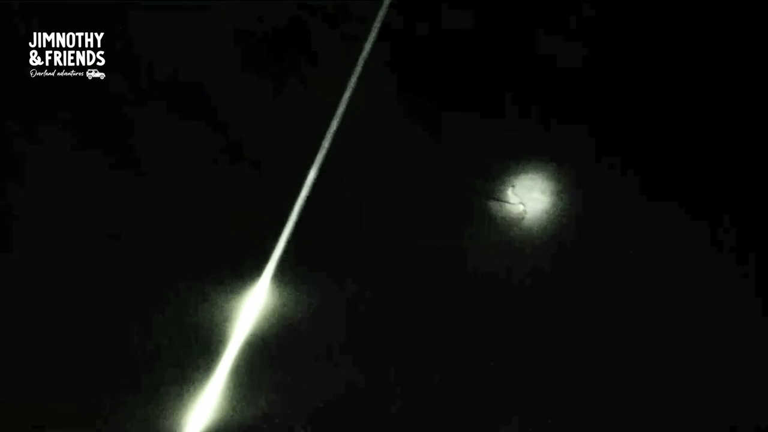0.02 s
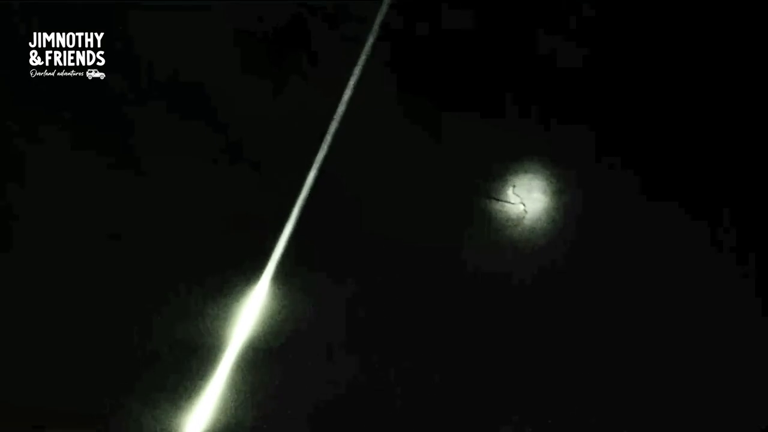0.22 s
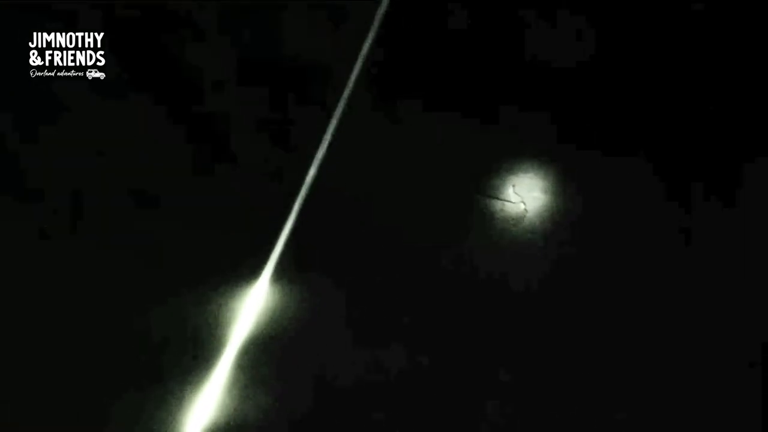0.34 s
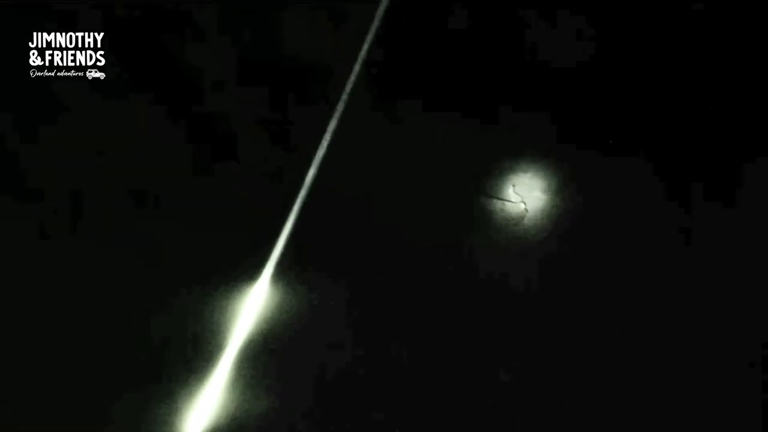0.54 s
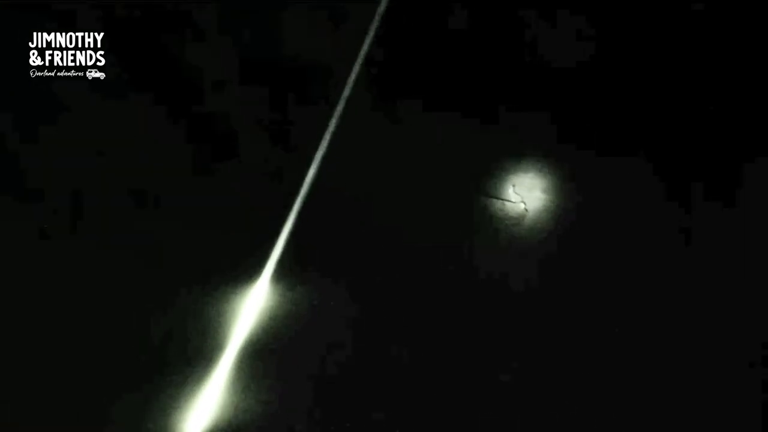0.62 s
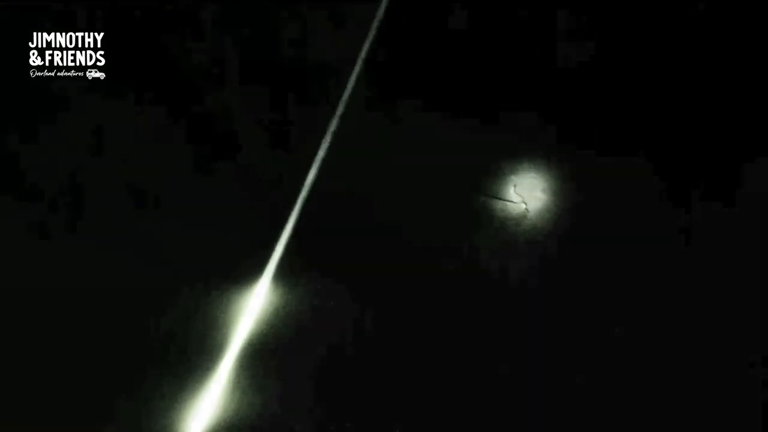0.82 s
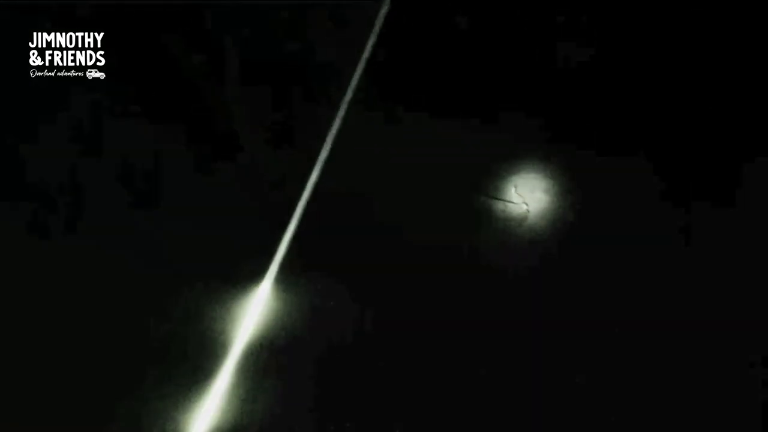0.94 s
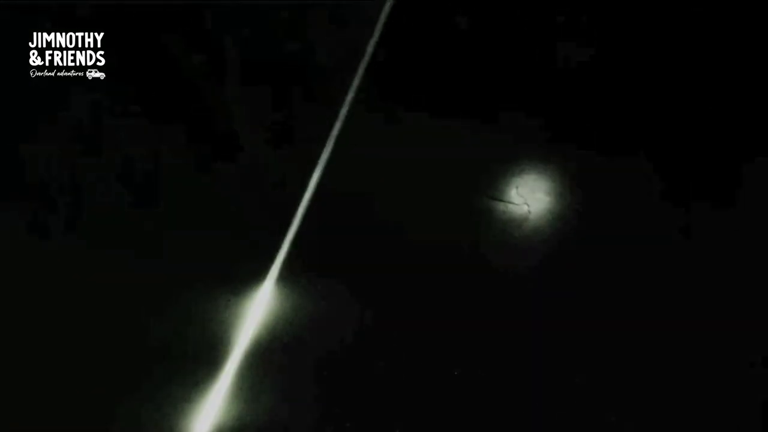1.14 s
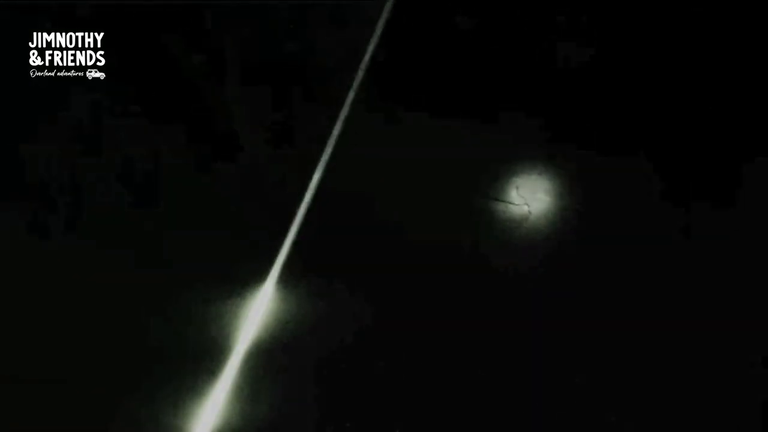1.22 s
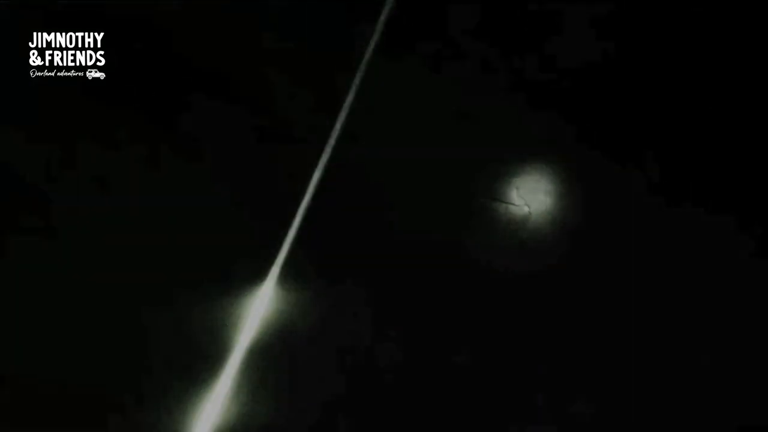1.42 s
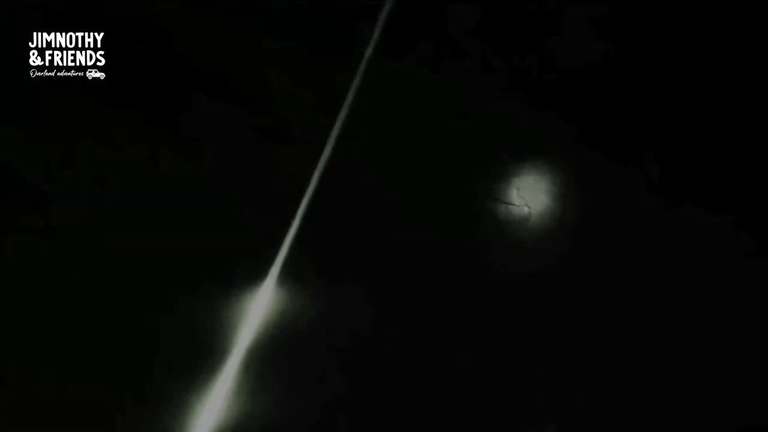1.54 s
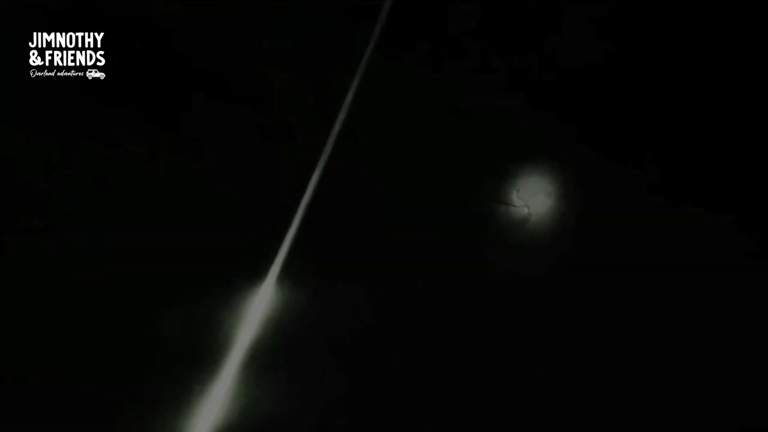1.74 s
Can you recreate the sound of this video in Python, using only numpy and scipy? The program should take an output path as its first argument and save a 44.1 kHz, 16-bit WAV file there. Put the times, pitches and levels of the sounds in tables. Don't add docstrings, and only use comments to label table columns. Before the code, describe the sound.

A near gecko gives six loud, dry clicking barks, each slowing and dulling; a second, fainter gecko alternates just before each one, with smeared distant callers and faint wind hiss on open sandy ground, small ringing microphone.

```python
import sys
import numpy as np
from scipy import signal
from scipy.fft import rfft, irfft, next_fast_len
from scipy.io import wavfile
from scipy.ndimage import uniform_filter1d, map_coordinates

SR = 44100
rng = np.random.default_rng(int(sys.argv[2]) if len(sys.argv) > 2 else 0)


def attenuation_scalar(level_db):
    decades = np.asarray(level_db, float) / 20
    return 10 ** decades


def dump(signal):
    limited = np.clip(np.atleast_2d(signal).T, -1, 1)
    pcm = np.round(limited * 32767).astype(np.int16)
    wavfile.write(sys.argv[1], SR, pcm)


N = 77175


def unit(x):
    return x / np.sqrt(np.mean(x ** 2) + 1e-20)


def along(points, hz):
    f, v = np.transpose(points)
    return np.interp(np.log(hz + 1), np.log(f + 1), v)


def wobble(rate):
    knots = rng.standard_normal(int(N * rate / SR) + 4)
    return map_coordinates(knots, [np.arange(N) * rate / SR])


def filtered(x, response):
    m = next_fast_len(len(x) + 8192)
    return irfft(rfft(x, m) * response(np.fft.rfftfreq(m, 1 / SR)), m)[:len(x)]


def causal(points):
    def response(hz):
        cepstrum = irfft(np.log(attenuation_scalar(along(points, hz))))
        half = len(cepstrum) // 2
        cepstrum[1:half] *= 2
        cepstrum[half + 1:] = 0
        return np.exp(rfft(cepstrum))
    return response


def night():
    # hz, level_db
    night_curve = [(15, -63), (32, -16), (60, 2), (240, -2), (600, -7.5), (2500, -9), (15600, -22.5),
                   (16100, -35.5)]
    # start_s, level_db
    night_level = [(0, -61.5), (.6, -62), (1.2, -62), (1.75, -64)]
    # hz, level_db
    chorus_curve = [(1500, -41), (3000, -12), (4200, -5), (5000, -15.5), (7000, -79)]
    z = signal.stft(rng.standard_normal(N), nperseg=512)[2]
    patches = uniform_filter1d(rng.standard_normal(z.shape), 6, 0)
    patches = unit(uniform_filter1d(patches, 8, 1))
    air = signal.istft(z * attenuation_scalar(1.5 * patches), nperseg=512)[1][:N]
    air = unit(filtered(air, lambda hz: attenuation_scalar(along(night_curve, hz))))
    blur = unit(filtered(rng.standard_normal(N), lambda hz: attenuation_scalar(along(chorus_curve, hz))))
    blur = blur * attenuation_scalar(-4 + wobble(33) + 4.4 * wobble(100))
    s, db = np.transpose(night_level)
    return attenuation_scalar(np.interp(np.arange(N) / SR, s, db)) * (air + blur)


def scrub_tail(size):
    # hz, t60_s
    scrub = [(500, 0.3), (2000, .22), (4200, 0.25), (8000, 0.14), (15000, 0.17)]
    hz, t, z = signal.stft(rng.standard_normal(size), SR, nperseg=128)
    decay = attenuation_scalar(-60 * t / along(scrub, hz)[:, None])
    h = signal.istft(z * decay, SR, nperseg=128)[1]
    return h / np.linalg.norm(h)


def burrow_mouth(burrow, t):
    ring_hz, ring_s, ring_db, rim_s, rim_db = burrow
    ring = attenuation_scalar(ring_db - 60 * t / ring_s) * np.sin(2 * np.pi * ring_hz * t)
    return ring + attenuation_scalar(rim_db) * np.sinc((t - rim_s) * SR)


def gecko(calls, bright, dull, burrow, count, fade_db, bend, last_db, scrub_db, grit,
          jitter, scatter_db, ground_db, ground_s):
    # hz, level_db
    grit_curve = [(3000, -86), (6500, -26.5), (8500, -33), (11500, -43), (13000, -48), (14800, -48),
                  (15800, -63), (17000, -88)]
    tiring, tiring_share = 5, .55
    k, t = np.arange(count) / (count - 1), np.arange(1500) / SR
    step = np.arange(count) / (count - 2)
    slack = (1 - tiring_share) * step ** .6 + tiring_share * step ** tiring
    losses = np.array([fade_db * k ** bend, last_db * k ** tiring, fade_db * k])
    ground = rng.standard_normal(len(t)) * attenuation_scalar(-60 * t / ground_s) * (t > .0008)
    ground = ground / np.linalg.norm(ground)
    ground_levels = attenuation_scalar(ground_db - np.array([[0], [4]]))
    mouth = burrow_mouth(burrow, t)
    out = np.zeros((3, N + SR))
    for s, db, first_hz, last_hz in calls:
        draw = rng.standard_normal((2, count))
        gaps = 1 / first_hz + (1 / last_hz - 1 / first_hz) * slack
        gaps = gaps * (1 + jitter * draw[0])
        at = s % (1 / SR) * SR + 8 + (np.cumsum(gaps) - gaps) * SR
        n = np.arange(2048)[:, None] - at
        clicks = np.sinc(n) * np.clip(1 - (n / 8) ** 2, 0, 1)
        sizes = attenuation_scalar(db + scatter_db * k * draw[1] - losses)
        space = attenuation_scalar(scrub_db) * np.pad(scrub_tail(14000), (200, 0))
        space[:len(t)] += mouth
        space[0] += 1
        space = np.array([space, space, 0 * space])
        space[:2, :len(t)] += ground_levels * ground
        space[2, :len(t)] = 0.29 * rng.standard_normal(len(t)) * attenuation_scalar(-60 * t / .009)
        heard = signal.fftconvolve(sizes @ clicks.T, space, axes=1)
        out[:, int(s * SR):][:, :heard.shape[1] - 8] += heard[:, 8:]
    bright_part = filtered(out[0, :N], causal(bright))
    dull_part = filtered(out[1, :N], causal(dull))
    grit_part = filtered(out[2, :N], causal(grit_curve))
    return attenuation_scalar(18.5) * (bright_part + dull_part + grit * grit_part)


def far_geckos():
    # start_s, level_db, first_click_rate_hz, last_click_rate_hz
    far_calls = [(.004, -51.5, 486, 401), (.024, -53, 510, 422), (.0763, -58, 582, 525),
                 (.105, -68, 510, 500), (.3821, -47, 478, 437), (.5917, -46.5, 543, 417),
                 (.738, -48.5, 515, 436), (.7568, -51, 518, 410), (.9598, -52.5, 522, 484),
                 (1.2786, -46.5, 494, 456), (1.39, -64, 504, 440), (1.4921, -59.5, 566, 520),
                 (1.534, -54.5, 487, 450), (1.592, -61, 512, 480), (1.7078, -43.5, 494, 481),
                 (1.733, -50.5, 488, 397)]
    # hz, level_db
    far_bright = [(2000, -41), (3200, -7.5), (4400, -7.5), (5000, -19), (6000, -14), (8000, -40)]
    far_dull = [(600, -24), (1400, -16), (2000, -6.5), (3000, -14), (5000, -54), (8000, -57)]
    # ring_hz, ring_t60_s, ring_db, rim_echo_s, rim_echo_db
    far_burrow = (4200, .012, -24, .001, -8)
    far_space = dict(last_db=6, jitter=.04, scatter_db=2, ground_db=13, ground_s=.11)
    return gecko(far_calls, far_bright, far_dull, far_burrow, count=9,
                 fade_db=15, bend=0.55, scrub_db=-25, grit=0, **far_space)


def second_gecko():
    # start_s, level_db, first_click_rate_hz, last_click_rate_hz
    second_calls = [
        (.1846, -32.5, 669, 626),
        (.3462, -34.5, 609, 568),
        (.5153, -35, 586, 570),
        (.6804, -33.5, 561, 554),
        (.851, -33.5, 552, 550),
        (1.0307, -32.5, 566, 483),
        (1.2283, -34.5, 560, 511),
    ]
    # hz, level_db
    second_bright = [(2000, -66.5), (2900, -18.5), (3300, -1), (4400, -1), (5000, -7), (5600, -10),
                     (6500, -16.5), (10000, -84)]
    second_dull = [(500, -60), (1100, -14), (2000, -7), (2700, -20), (4000, -11.5), (8000, -92.5)]
    # ring_hz, ring_t60_s, ring_db, rim_echo_s, rim_echo_db
    second_burrow = (4350, .01, -24, .0009, -8)
    second_space = dict(last_db=6, jitter=.012, scatter_db=1.5, ground_db=-5, ground_s=.02)
    return gecko(second_calls, second_bright, second_dull, second_burrow, count=8,
                 fade_db=13.5, bend=2.33, scrub_db=-10.5, grit=0, **second_space)


def near_gecko():
    # start_s, level_db, first_click_rate_hz, last_click_rate_hz
    near_calls = [
        (.2021, -6.5, 518, 331.7),
        (.4068, -5.5, 524, 319.3),
        (.6114, -6, 492.7, 324.4),
        (.8276, -6, 491, 306.5),
        (1.0565, -6.5, 491.7, 313),
        (1.3048, -7, 446, 328),
    ]
    # hz, level_db
    near_bright = [(300, -103), (1600, -40.5), (3200, -9), (4600, -4.5), (6200, -12), (8000, -31.5),
                   (11500, -46), (16000, -63)]
    near_dull = [(250, -66), (420, -26.5), (640, -35.5), (860, -22.5), (1600, -10.5), (2100, -9.5),
                 (3300, -10.5), (9000, -71.5)]
    # ring_hz, ring_t60_s, ring_db, rim_echo_s, rim_echo_db
    near_burrow = (4115, .025, -25.5, .00121, -8)
    near_space = dict(last_db=8, jitter=.015, scatter_db=2.5, ground_db=-9, ground_s=.025)
    return gecko(near_calls, near_bright, near_dull, near_burrow, count=10,
                 fade_db=20.5, bend=1.51, scrub_db=-16, grit=1, **near_space)


def microphone(hz):
    # centre_hz, width_hz, level_db
    rings = [(4396, 497, 5.5), (4400, 317, 6.5)]
    response = 1
    for centre, width, db in rings:
        damping = 1j * hz * width
        response = response + attenuation_scalar(db) * damping / (centre * centre - hz * hz + damping)
    return response


def scene():
    callers = far_geckos() + second_gecko() - near_gecko()
    return (night() + filtered(callers, microphone))[None]


def top_cut(x):
    return signal.sosfilt(signal.butter(12, 16520, fs=SR, output="sos"), x)


def record(dry):
    mix = filtered(dry[0], lambda hz: hz < 16500)[None]
    return top_cut(mix)


dry = scene()
out = record(dry)
dump(out)
```